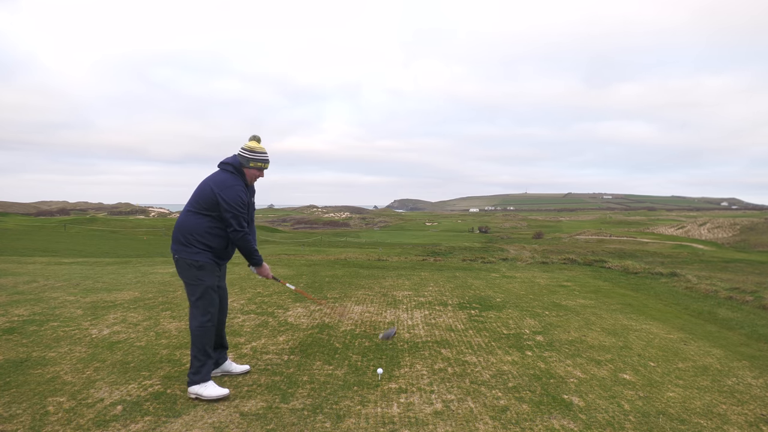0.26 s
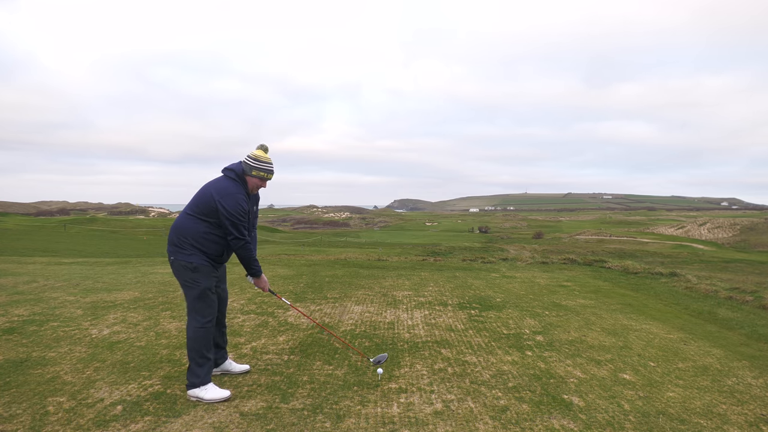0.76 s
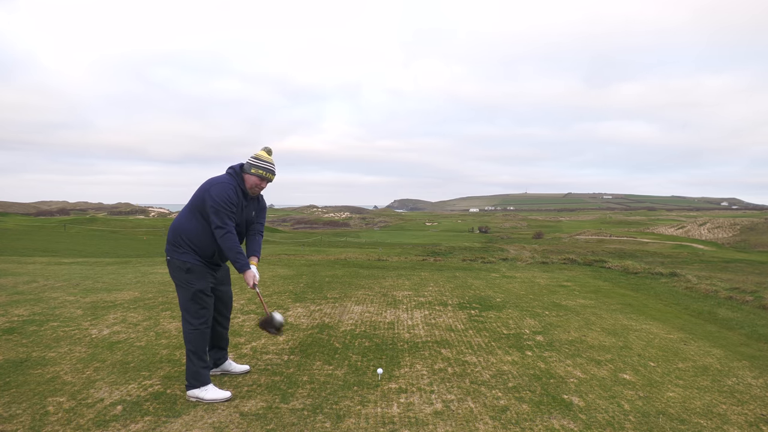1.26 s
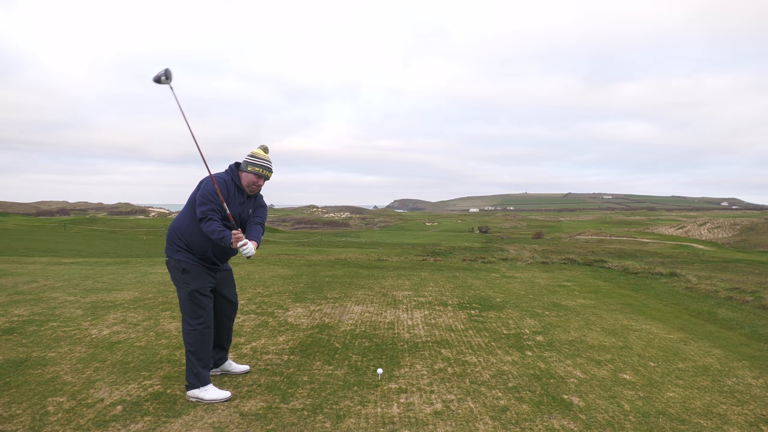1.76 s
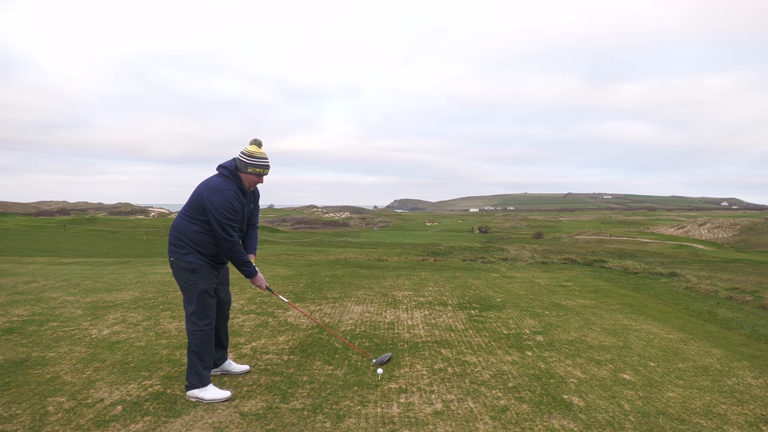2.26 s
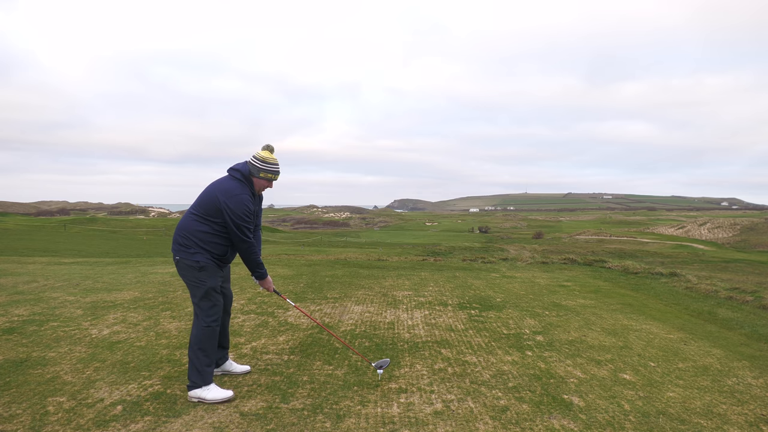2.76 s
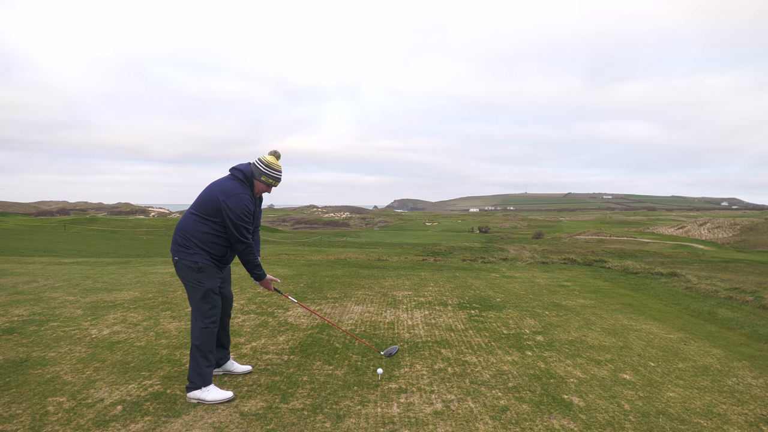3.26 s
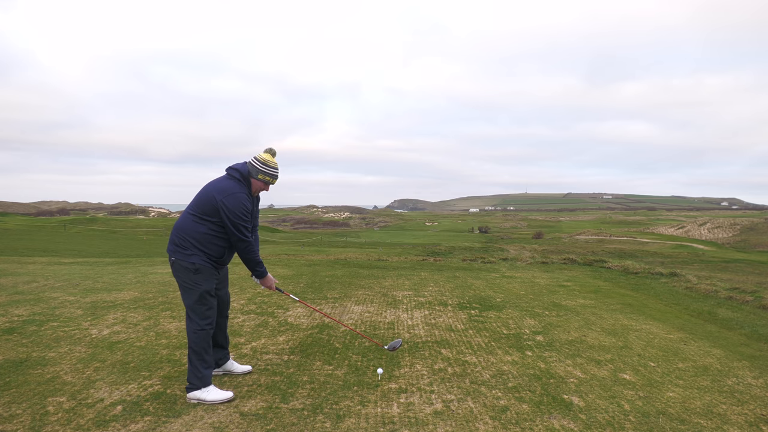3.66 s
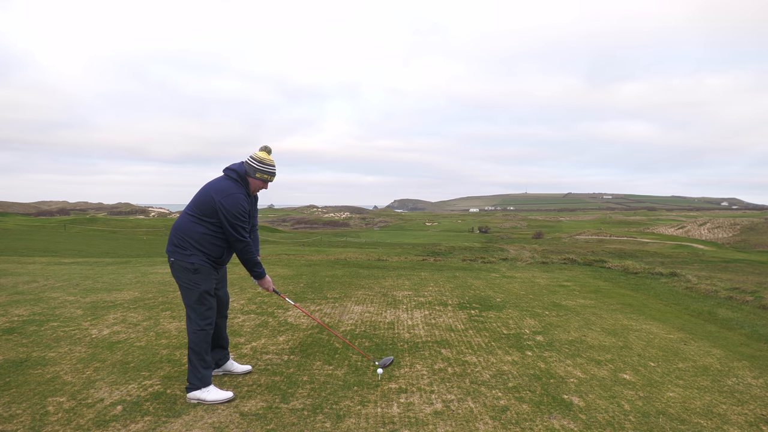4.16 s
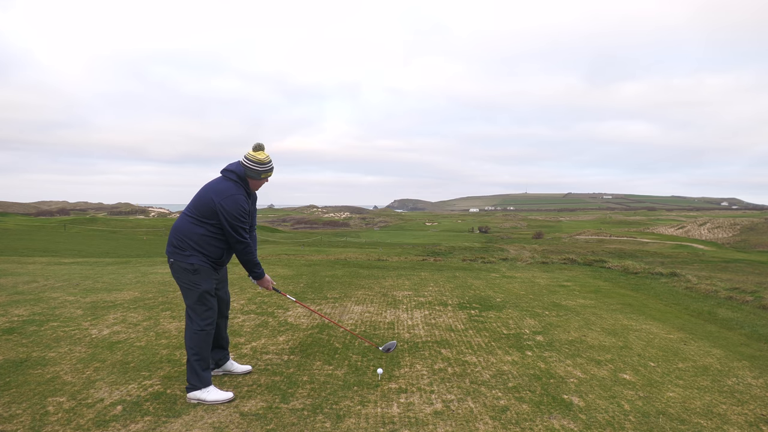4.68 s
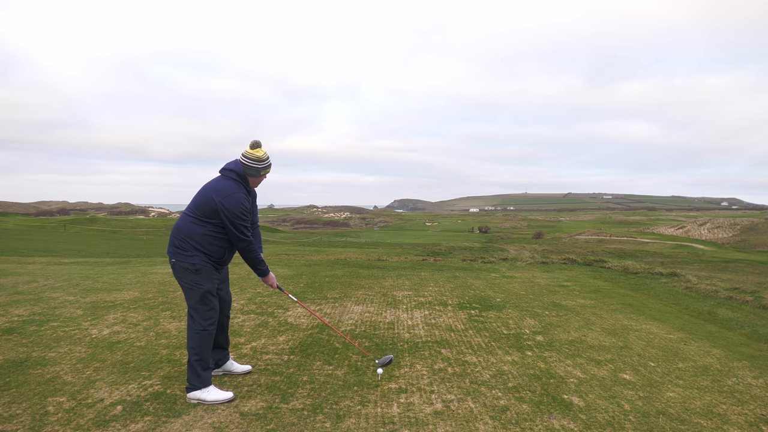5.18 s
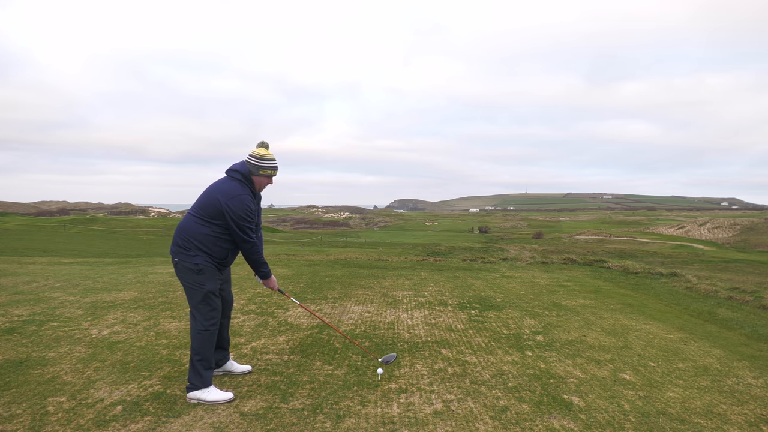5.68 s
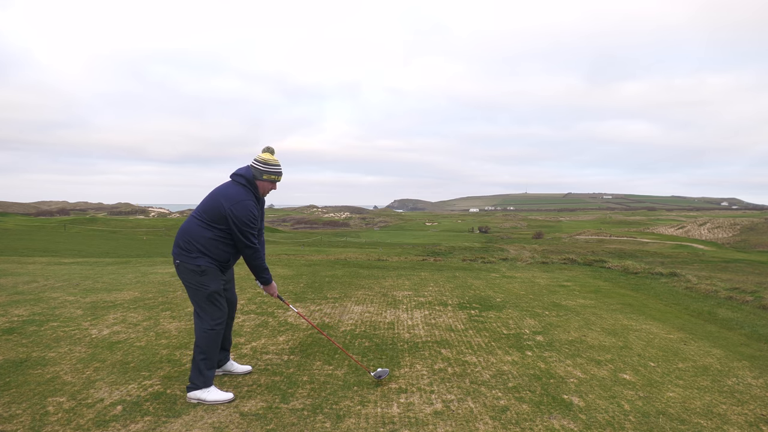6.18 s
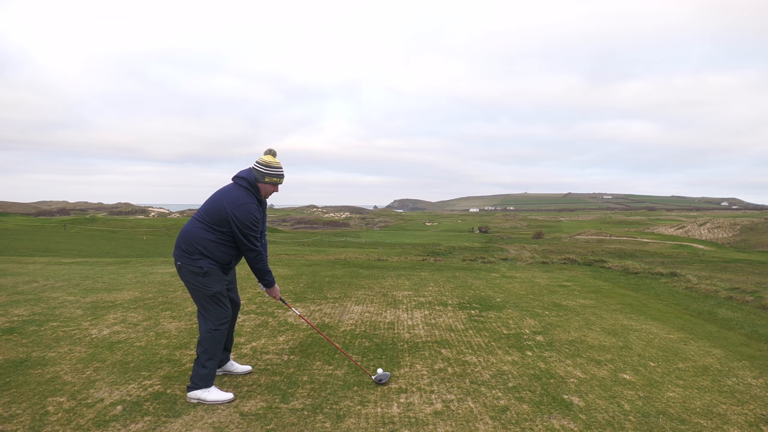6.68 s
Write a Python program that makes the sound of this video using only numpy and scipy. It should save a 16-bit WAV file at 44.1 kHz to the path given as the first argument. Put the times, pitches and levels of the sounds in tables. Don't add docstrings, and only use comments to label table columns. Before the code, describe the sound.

Quiet windy open turf with soft rustles and distant bird notes, broken by a single bright metallic club hit on a ball.

```python
import sys
import numpy as np
from scipy import signal
from scipy.fft import rfft, irfft, next_fast_len
from scipy.io import wavfile
from scipy.ndimage import uniform_filter1d, map_coordinates

SR = 44100
rng = np.random.default_rng(int(sys.argv[2]) if len(sys.argv) > 2 else 0)


def log_audio(samples):
    frames = np.atleast_2d(samples).T
    limited = np.clip(frames, -1, 1)
    pcm = np.round(limited * 32767).astype(np.int16)
    wavfile.write(sys.argv[1], SR, pcm)


def invert_db(level):
    return 10 ** (np.asarray(level, dtype=float) / 20)


N = 305613


def unit(x):
    return x / np.sqrt(np.mean(x ** 2) + 1e-20)


def along(points, hz):
    f, v = np.transpose(points)
    return np.interp(np.log(hz + 1), np.log(f + 1), v)


def curve(rows):
    s, values = np.transpose(rows)
    return np.interp(np.arange(N) / SR, s, values)


def wobble(rate):
    knots = rng.standard_normal(int(N * rate / SR) + 4)
    return map_coordinates(knots, [np.arange(N) * rate / SR])


def peak_db(s, db, rise, fall, hold=0):
    t = np.arange(N) / SR - s
    slope = np.maximum(-t / abs(rise), (t - hold) / abs(fall))
    return db - 20 * np.maximum(0, slope)


def loudest(rows):
    return invert_db(np.max([peak_db(*row) for row in rows], axis=0))


def filtered(x, response):
    m = next_fast_len(N + SR // 2)
    return irfft(rfft(x, m) * response(np.fft.rfftfreq(m, 1 / SR)), m)[..., :N]


def resonances(modes):
    def response(f):
        total = 0
        for k, (c, w, db) in enumerate(modes):
            total = total + (-1) ** k * invert_db(db) * 1j * f * w / (c * c - f * f + 1j * f * w)
        return total
    return response


def burst(seconds, decay):
    count = round(seconds * SR)
    x = rng.standard_normal(count) * np.exp(-np.arange(count) / SR / abs(decay))
    return x / np.linalg.norm(x)


def rush(spectrum, patchy_db):
    z = signal.stft(rng.standard_normal(N + 512), nperseg=512)[2]
    field = uniform_filter1d(rng.standard_normal(z.shape), size=5, axis=0)
    field = uniform_filter1d(field, size=10, axis=1)
    x = signal.istft(z * invert_db(patchy_db * unit(field)), nperseg=512)[1][:N]
    return unit(filtered(x, lambda hz: invert_db(along(spectrum, hz))))


def strike():
    # hz, width_hz, level_db
    face_modes = [
        [(1213.2, 240, -4.5)],
        [(1850, 350, -10)],
        [(2339.1, 210, 2)],
        [(3250, 190, -6), (3860, 440, -1)],
    ]
    # hz, width_hz, level_db
    crown_modes = [
        (5700, 735, -1),
        (6793, 318, -3),
        (8348, 1410, -2),
        (11502, 341, 0),
        (13400, 1200, -9.5),
        (15000, 600, -16.5),
    ]
    # delay_s, level_db, smear_s, brightness_db
    reflections = [
        (.0055, -22, 0.004, -3),
        (0.013, -34.5, 0.01018, -1.5),
        (.0205, -23, 0.0012, -7.5),
        (.03, -43, 0.023, -20),
    ]
    at, push, shimmer = round(2.8699 * SR), np.zeros(N), np.zeros(N)
    push[at] = 1
    late = burst(.01, decay=0.001037)
    shimmer[at + 22:][:len(late)] = invert_db(-18) * late
    for delay_s, db, smear_s, bright_db in reflections:
        scatter = burst(.12, smear_s)
        start = at + round(delay_s * SR)
        push[start:][:len(scatter)] += invert_db(db) * scatter
        shimmer[start:][:len(scatter)] += invert_db(db + bright_db) * scatter
    thump = filtered(push, resonances([(420, 400, -18), (760, 200, -20)]))
    capsule = resonances([(2900, 3000, .1)])
    face = filtered(push, lambda f: sum(resonances(group)(f) for group in face_modes) * capsule(f))
    crown = filtered(shimmer, resonances(crown_modes))
    return invert_db(6.5) * (thump + face + crown)


def ticks():
    # start_s, peak_db, knock_hz, snap_hz, snap_minus_peak_db
    tick_rows = [(0.5202, -23.5, 2450, 5900, -23), (0.5597, -32, 2859, 5912, -16),
                 (0.957, -42, 3790, 9600, -11), (2.1670, -31, 3597, 6401, -13),
                 (2.17, -35.5, 3700, 6407, -13.5), (2.4044, -41.5, 3392, 8600, -11),
                 (2.653, -35, 3595, 6504, -17), (2.945, -44, 2835, 8000, -11),
                 (3.019, -43.5, 2680, 7300, -3), (3.0466, -34.5, 4000, 4500, -13),
                 (3.567, -25.5, 2463, 5900, -22), (3.571, -34, 2500, 5907, -13.5),
                 (3.5733, -35.5, 3292, 6000, -8), (3.5893, -41, 2840, 6200, -15.5),
                 (3.8196, -33.5, 3472, 9000, -12), (3.8665, -37, 3285, 5000, -30.5),
                 (4.2406, -40.5, 2668, 6198, -7), (6.5553, -43, 4300, 7800, -7)]
    out, span = np.zeros(N + SR), SR // 20
    f = np.fft.rfftfreq(span, 1 / SR)
    presence = resonances([(3300, 2400, 1)])(f) ** 3
    lead = SR // 1600
    for s, db, knock_hz, snap_hz, snap_db in tick_rows:
        snap_width_hz = 1700 * (snap_hz / 6000) ** 4.2
        knock = resonances([(knock_hz, 700, .1)])(f) + resonances([(3800, 900, -4)])(f)
        snap = resonances([(snap_hz, abs(snap_width_hz), snap_db / 2 + 3)])(f) ** 2
        jolt = invert_db(-4) * np.pad(burst(.015, decay=.0025), (lead, span))[:span]
        jolt[lead] += 1
        tick = irfft(rfft(jolt) * (knock * presence + snap), span)
        out[round(s * SR):][:span] += invert_db(db + 13.5) * tick
    return out[:N]


def rustle():
    # hz, density_db
    cloth_spectrum = [(2000, -38), (4200, 3), (4900, -3.5), (6000, -5), (7500, -9), (9500, -13.5),
                      (12000, -21.5), (15000, -24.5)]
    # hz, density_db
    turf_spectrum = [(1000, -44), (1600, -23), (2200, -22), (3000, -6), (3500, 1), (4100, -6.5),
                     (4700, -14), (6000, -34)]
    # peak_s, level_db, rise_s and fall_s per 20 dB
    strokes = [(0, -64, 0.099, 0.976), (.45, -66, 0.458, 0.298), (.75, -66, 0.1697, 0.9215),
               (.86, -60.5, 0.453, 0.1486), (1.3, -73.5, 0.901, -1.3866), (1.6, -64, 0.4896, -0.308),
               (2.315, -57, .07, .25), (2.35, -58, .12, .15), (2.65, -67, 0.448, 0.7717),
               (2.9, -69, .4, 0.1568), (3.15, -69, 0.891, 1.0739), (3.33, -63, 0.1994, 0.179),
               (4.22, -66, 0.159, 0.0555), (5.85, -71.5, 0.704, -0.005)]
    cloth_grains = unit(invert_db(2.5 * wobble(350)) * rush(cloth_spectrum, patchy_db=.8))
    turf_grains = unit(invert_db(2.5 * wobble(350)) * rush(turf_spectrum, patchy_db=.6))
    scuff_db = peak_db(s=2.3, db=-48.5, rise=0.0353, fall=0.0992, hold=0.04135)
    direct = loudest(strokes) * cloth_grains + invert_db(scuff_db) * turf_grains
    return filtered(direct, lambda hz: 0.9744 + 0.5044 * np.exp(-2j * np.pi * hz * 0.0031))


def glide(s, length, db, shares, hz, blur):
    t = np.arange(0, abs(length), 1 / SR)
    u = t / abs(length)
    ends = np.clip(np.minimum(t, t[-1] - t) / 0.005465, 0, 1)
    arch = invert_db(db + 4 - 1.5 * (2 * u - 1) ** 2)
    pitch_hz = np.interp(u, shares, hz) * blur[:len(t)]
    return s, ends * arch * np.sin(2 * np.pi * np.cumsum(pitch_hz) / SR)


def birds():
    # start_s, length_s, from_hz, to_hz, level_db
    note_rows = [(.045, 0.03156, 3930, 3702, -53), (.465, 0.02415, 3800, 4067, -56),
                 (.96, 0.0631, 3800, 3700, -61), (2.39, 0.0559, 3374, 3438, -59.5),
                 (2.441, 0.04957, 3700, 3600, -60.5), (2.61, 0.04598, 3525, 3450, -63),
                 (2.69, 0.0686, 3817, 3324, -58), (5.801, 0.03177, 4260, 4179, -63.5),
                 (6.019, 0.2775, 3581, 3679, -68), (6.554, 0.04198, 4312, 3940, -62),
                 (6.596, 0.0627, 3960, 4020, -64), (4.539, 0.0515, 4513, 5800, -75),
                 (.78, 0.0408, 6000, 6395, -75), (1.636, 0.03013, 5846, 6316, -75),
                 (6.6, 0.036, 5900, 6392, -73.5), (6.87, 0.03847, 5906, 6209, -73.5),
                 (2.174, .03, 3559, 3516, -61.5), (5.7, 0.1093, 3450, 3534, -65),
                 (6.7, 0.2023, 3650, 3600, -67.5)]
    # start_s, length_s, level_db
    chips = [
        (1.351, .04, -65.5),
        (1.395, 0.04796, -65),
    ]
    chip_hz, rise_hz_per_s, turn_share, drop_hz = 5800, 17000, 0.7057, 500
    out = np.zeros(N + SR)
    blur = 1 + .006 * wobble(250)
    notes = []
    for s, length, from_hz, to_hz, db in note_rows:
        notes.append(glide(s, length, db, [0, 1], [from_hz, to_hz], blur))
    for s, length, db in chips:
        top_hz = chip_hz + rise_hz_per_s * turn_share * length
        pitches_hz = [chip_hz, top_hz, top_hz - drop_hz]
        notes.append(glide(s, length, db, [0, turn_share, 1], pitches_hz, blur))
    for s, note in notes:
        out[round(s * SR):][:len(note)] += note
    return out[:N] * invert_db(np.clip(3.5 * wobble(150), -20, 4) - 1)


def lark_voice(hz):
    pitch_hz = hz * (1 + .025 * wobble(30) + .01 * wobble(300))
    syllables = invert_db(np.clip(6 * wobble(25), -30, 7))
    return np.sin(2 * np.pi * np.cumsum(pitch_hz) / SR) * syllables


def larks():
    # peak_s, level_db, rise_s and fall_s per 20 dB
    bouts = [
        (.1, -70, 1.5, 1.5),
        (.8, -68, 1.5, 1.5),
        (2.35, -68, 1.5, 1.5),
        (3.4, -73, 3, 3),
        (5.9, -69, 1.5, 2.5),
        (6.8, -69, 1.5, 1.5),
    ]
    return loudest(bouts) * (lark_voice(hz=3700) + 0.32 * lark_voice(hz=3457.8))


def wind():
    # hz, density_db
    deep_spectrum = [(10, -28), (20, -6), (40, -0.5), (62, -0.5), (80, -14.5), (120, -57)]
    # hz, density_db
    flutter_spectrum = [(40, -51.5), (58, -18.5), (75, -0.5), (177, -7), (262, -16.5), (392, -25.5),
                        (500, -34), (650, -81)]
    # time_s, level_db
    wind_rows = [(0, -59), (.35, -58), (.7, -59.5), (1.0, -55), (1.5, -56), (1.95, -59), (2.6, -62.5),
                 (2.9, -56.5), (3.05, -69.5), (3.5, -60), (4.0, -64), (4.15, -55.5), (4.35, -60),
                 (4.75, -57), (5.3, -55), (6.0, -59), (6.6, -59.5), (6.93, -60.5)]
    # peak_s, rise_over_wind_db, half_length_s
    gusts = [(0.065, 14.5, 0.0515), (.17, 8.5, 0.0428), (0.278, 10, 0.0482), (0.404, 15.5, 0.0724),
             (0.518, 19.5, 0.13284), (0.976, 4, 0.1223), (1.144, 7.5, 0.0606), (1.604, 12, 0.05697),
             (1.751, 6.5, 0.1047), (1.983, 6.5, 0.071), (2.376, 5.5, 0.0657), (2.793, 7, 0.1542),
             (3.278, 8.5, 0.0594), (4.511, 6, 0.0499), (4.935, 10.5, 0.08794), (5.215, 5.5, 0.0563),
             (5.687, 8.5, 0.08844), (5.905, 3, 0.0533), (6.766, 5, 0.0826)]
    t = np.arange(N) / SR
    wind_db = curve(wind_rows)
    gust_shapes = [db * np.clip(1 - abs(t - s) / abs(half), 0, 1) for s, db, half in gusts]
    gust_db = np.max(gust_shapes, axis=0)
    deep = invert_db(wind_db + gust_db + 1.5) * rush(deep_spectrum, patchy_db=.5)
    flutter_db = -57.5 + 0.6569 * (wind_db + 59.5) + 0.3807 * gust_db
    flutter = unit(invert_db(1.409 * wobble(11)) * rush(flutter_spectrum, patchy_db=0.5))
    return deep + invert_db(flutter_db) * flutter


def surf():
    # hz, density_db
    surf_spectrum = [(250, -44.5), (400, -12.5), (700, -9.5), (1100, -16.5), (1640, -24.5), (2000, -5),
                     (2400, 0.5), (2900, 1.5), (3700, 1.5), (4200, -3), (4800, -18.5), (6000, -21.5)]
    # time_s, level_db
    swell = [(0.0, -57.5), (0.46, -59), (0.85, -54.5), (1.18, -57.5), (1.41, -56.5), (1.58, -55.5),
             (2.01, -57.5), (2.31, -56), (2.87, -59.5), (3.24, -57.5), (3.73, -58), (4.3, -60),
             (4.77, -59.5), (5.02, -59.5), (5.56, -59.5), (5.81, -55.5), (6.37, -59.5), (6.93, -56.5)]
    surf_db = curve(swell) - 0.0635 + 0.5959 * wobble(9)
    return invert_db(surf_db) * rush(surf_spectrum, patchy_db=0.9598)


def split_bands():
    low_limit_hz, high_limit_hz, band_ratio = 4500, 14000, 1.2
    out, span = np.zeros(N + SR), 1500
    f = np.fft.rfftfreq(span, 1 / SR)
    for when, where in rng.random((23, 2)):
        low_hz = low_limit_hz * (high_limit_hz / low_limit_hz) ** where
        band = (f > low_hz) & (f < low_hz * band_ratio)
        noise = irfft(rfft(rng.standard_normal(span)) * band, span)
        out[round(when * N):][:span] += np.hanning(span) * noise
    return invert_db(-62.5) * out[:N] * [[1], [-1]]


def scene():
    near = strike() + ticks() + rustle()
    far = birds() + larks() + wind() + surf()
    return np.tile(near + far, (2, 1))


def roll_off(x):
    return signal.sosfilt(signal.butter(12, 16240, fs=SR, output="sos"), x)


def record(dry):
    # hz, density_db
    hiss_spectrum = [(300, -0.5), (1000, -4), (1700, -9.5), (4500, 1), (7000, -1.5), (15500, -2)]
    # hz, rms_db
    whistle_tones = [
        (15600, -85),
        (15650, -88),
    ]
    t = np.arange(N) / SR
    hiss = invert_db(-64) * rush(hiss_spectrum, patchy_db=1.3473)
    whistle = sum(invert_db(db + 3) * np.sin(2 * np.pi * hz * t) for hz, db in whistle_tones)
    mix = filtered(dry + hiss + whistle + split_bands(), lambda hz: hz < 15730)
    offset = -.0017
    return roll_off(mix + offset)


dry = scene()
out = record(dry)
log_audio(out)
```